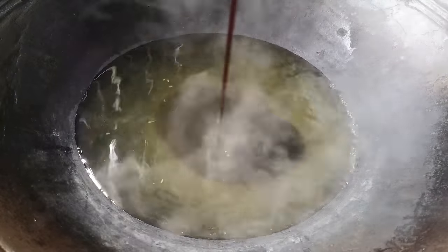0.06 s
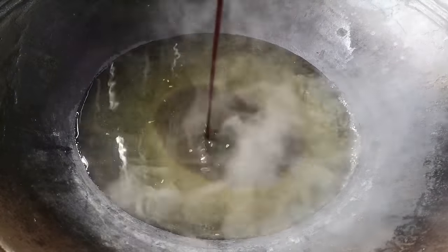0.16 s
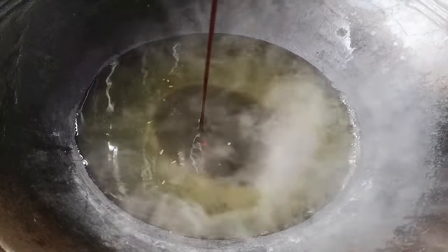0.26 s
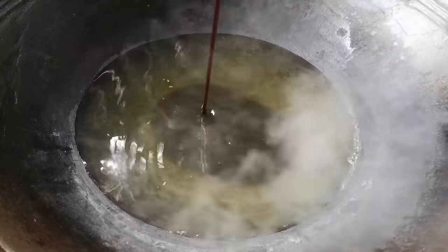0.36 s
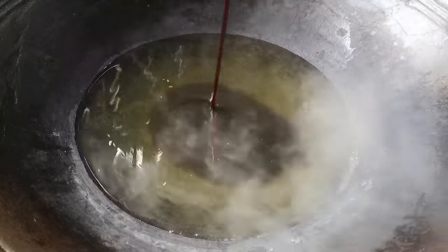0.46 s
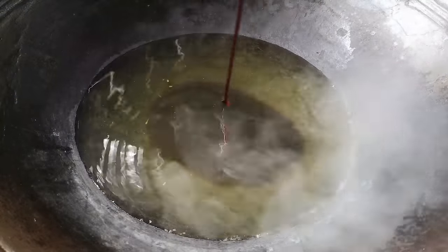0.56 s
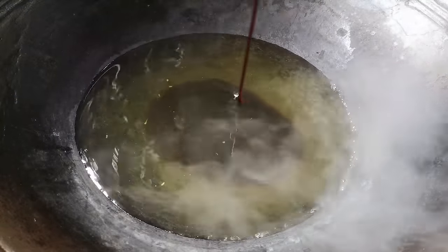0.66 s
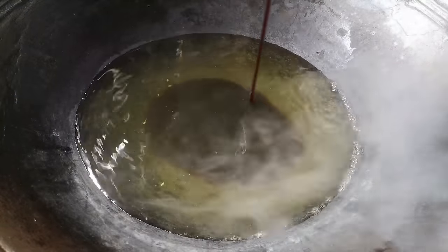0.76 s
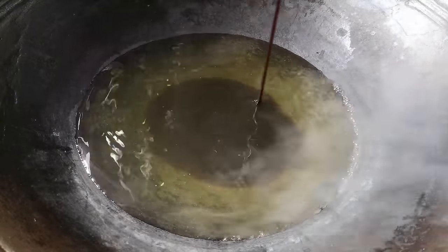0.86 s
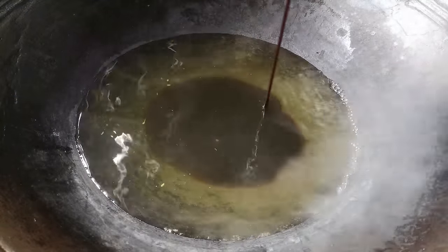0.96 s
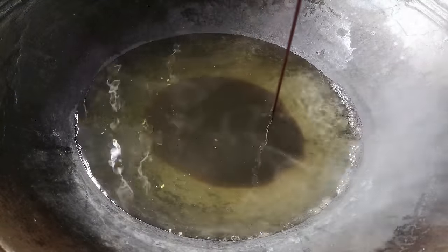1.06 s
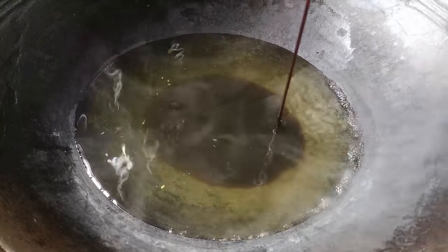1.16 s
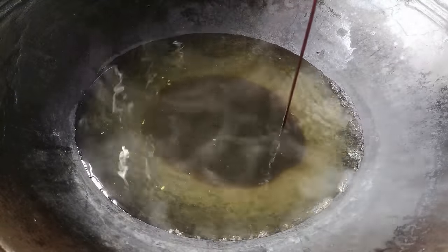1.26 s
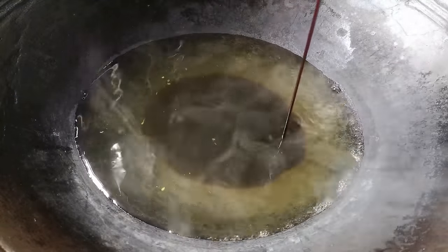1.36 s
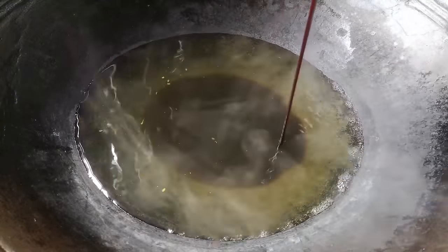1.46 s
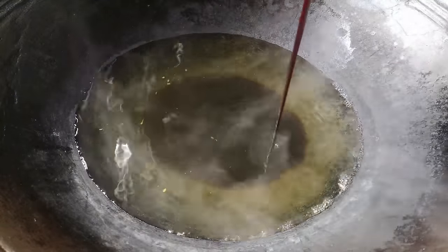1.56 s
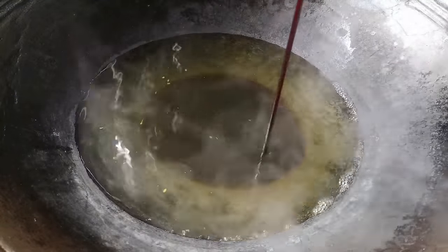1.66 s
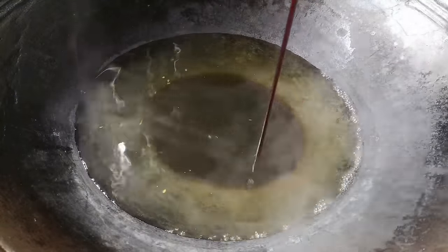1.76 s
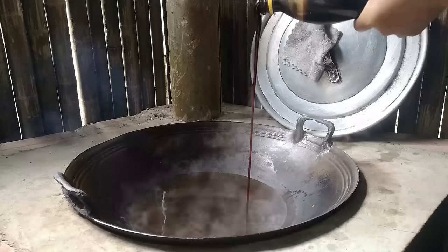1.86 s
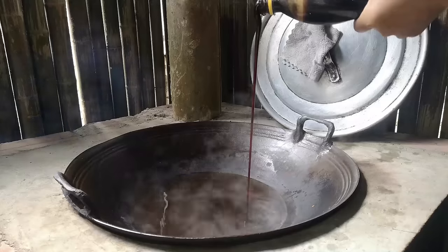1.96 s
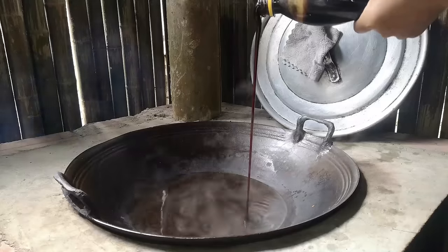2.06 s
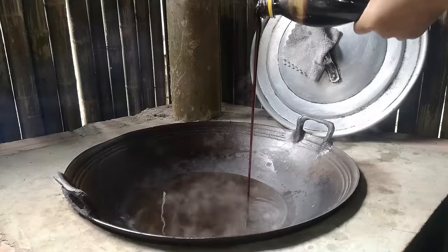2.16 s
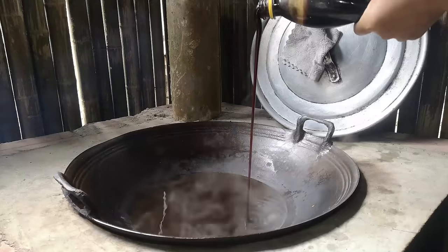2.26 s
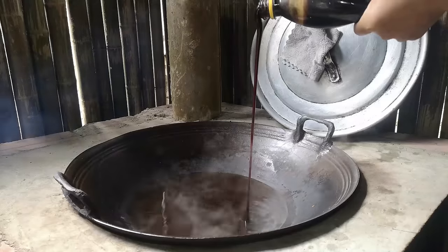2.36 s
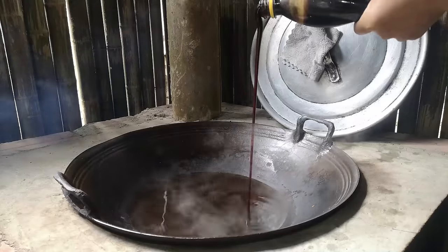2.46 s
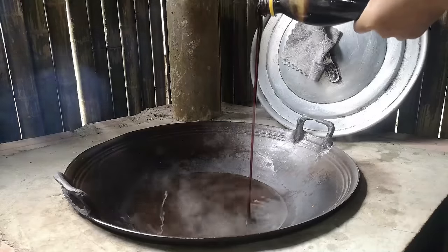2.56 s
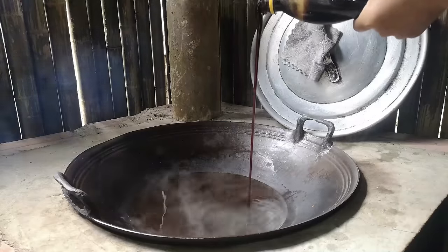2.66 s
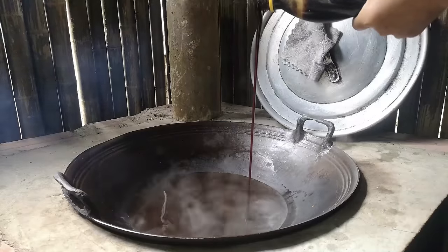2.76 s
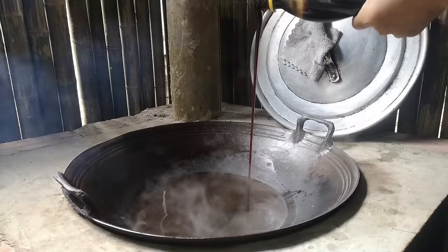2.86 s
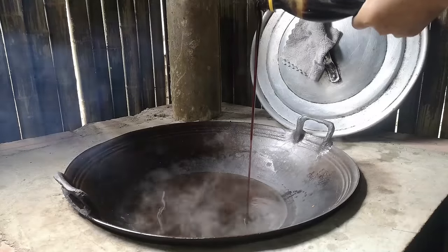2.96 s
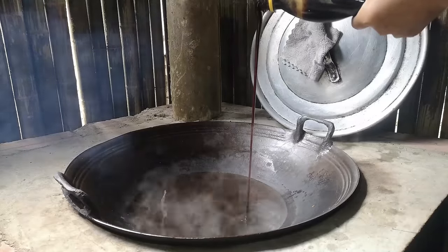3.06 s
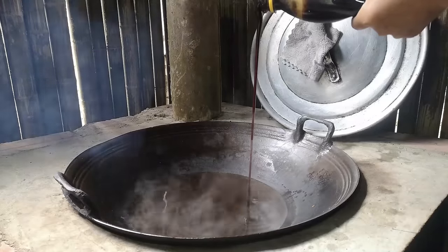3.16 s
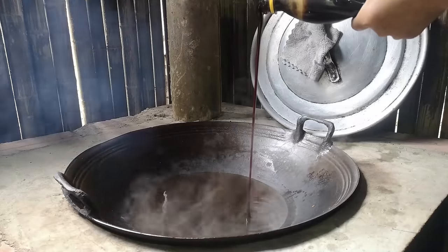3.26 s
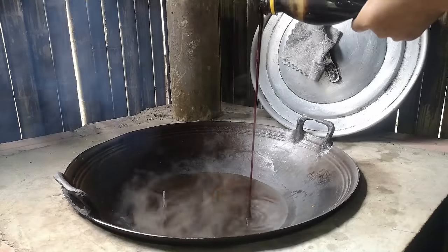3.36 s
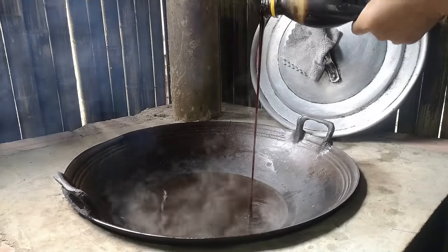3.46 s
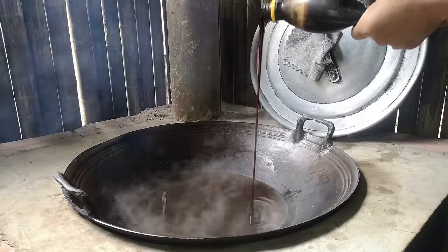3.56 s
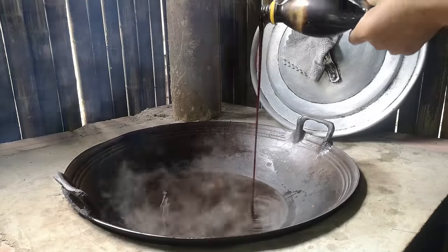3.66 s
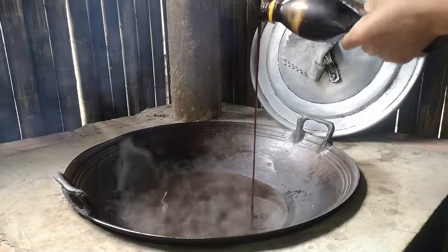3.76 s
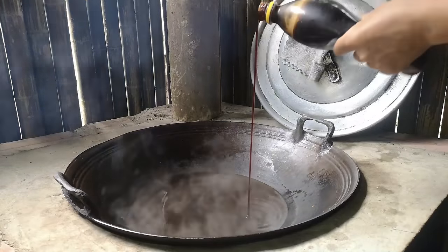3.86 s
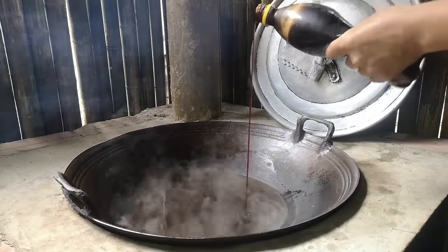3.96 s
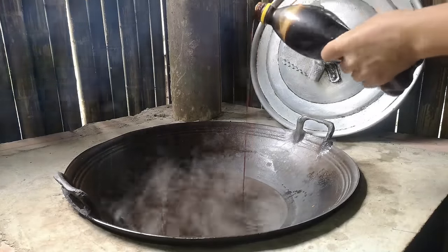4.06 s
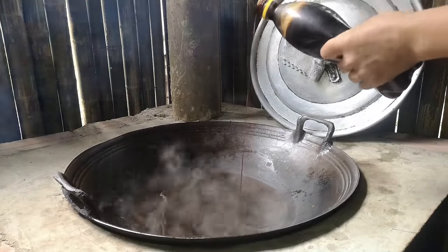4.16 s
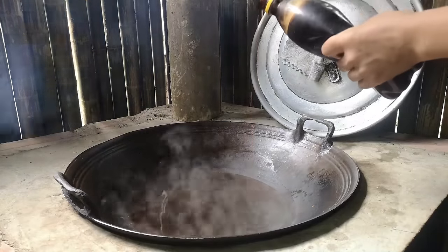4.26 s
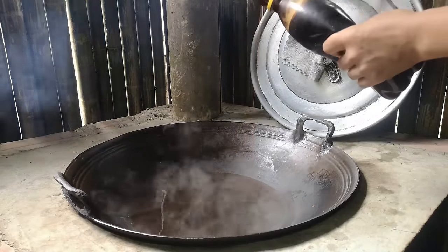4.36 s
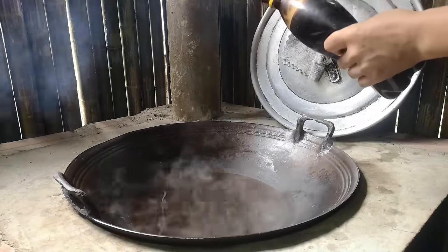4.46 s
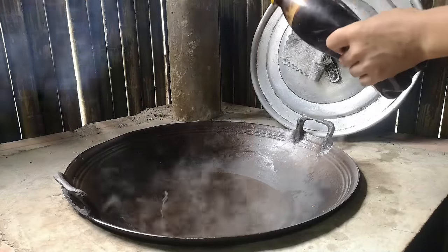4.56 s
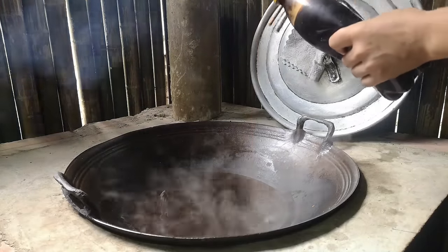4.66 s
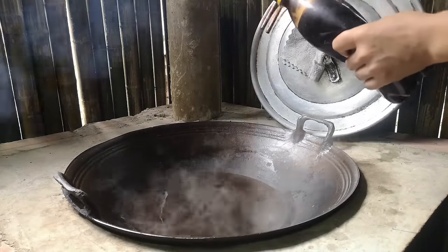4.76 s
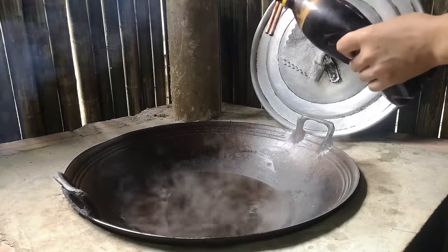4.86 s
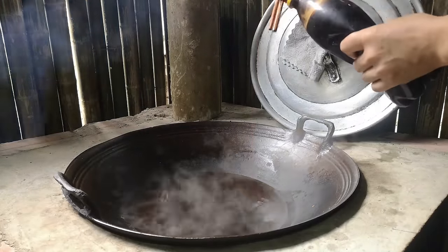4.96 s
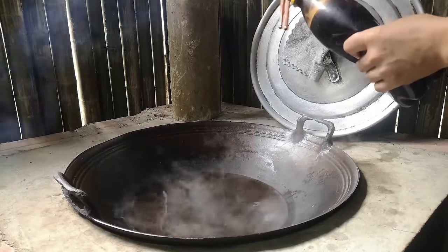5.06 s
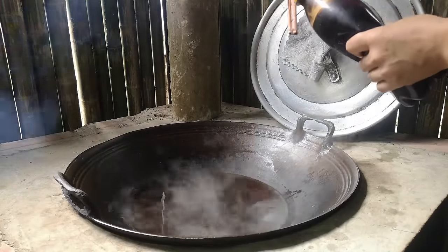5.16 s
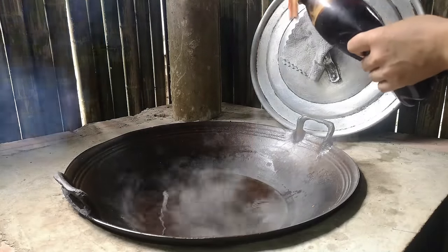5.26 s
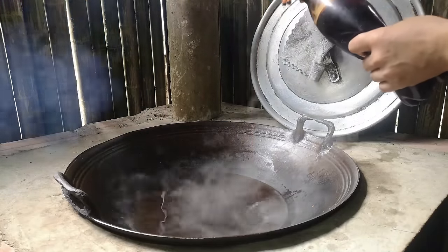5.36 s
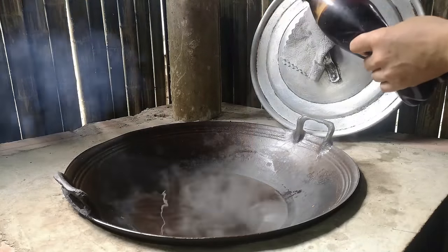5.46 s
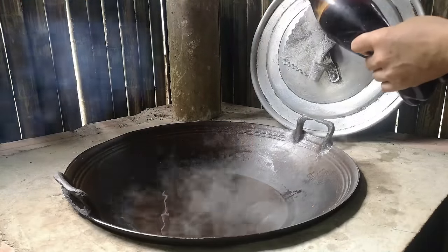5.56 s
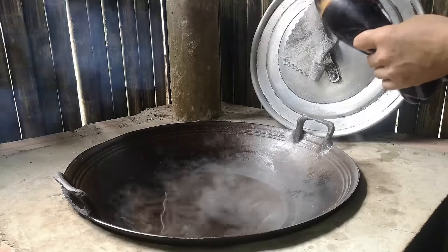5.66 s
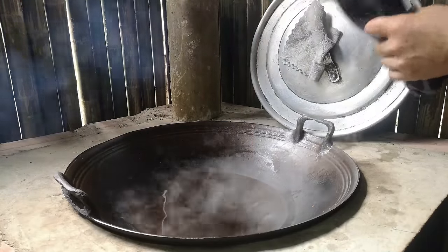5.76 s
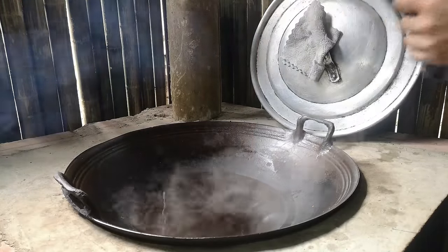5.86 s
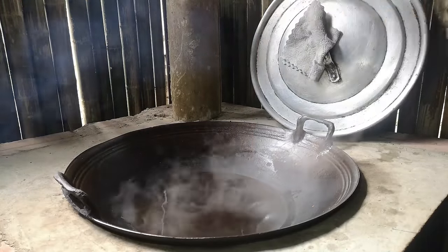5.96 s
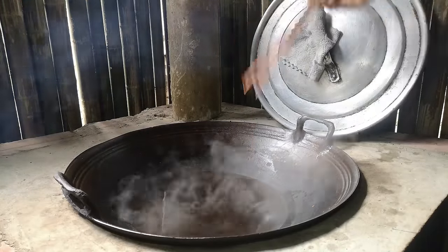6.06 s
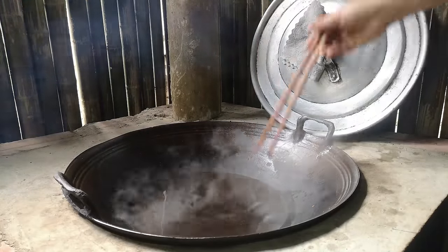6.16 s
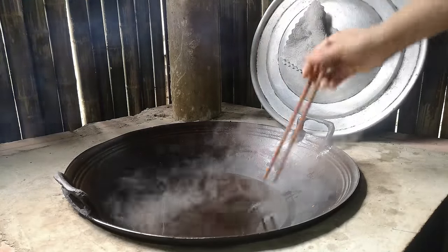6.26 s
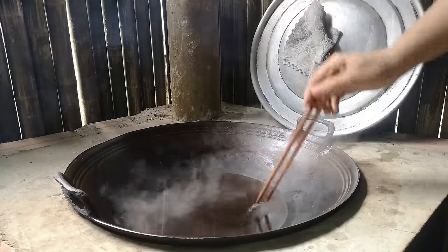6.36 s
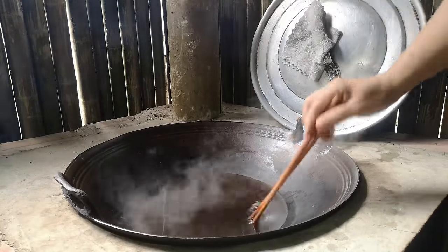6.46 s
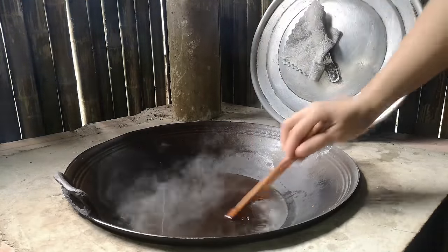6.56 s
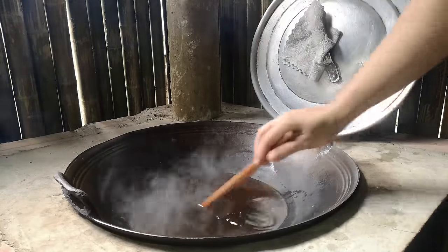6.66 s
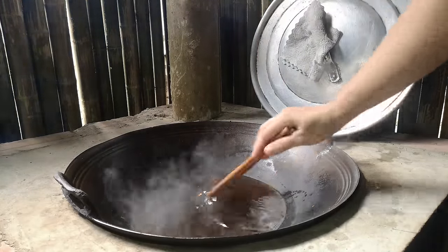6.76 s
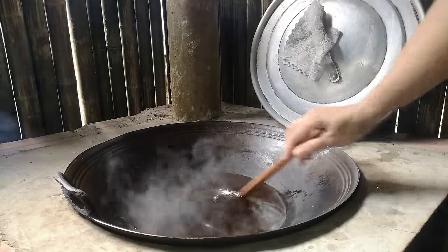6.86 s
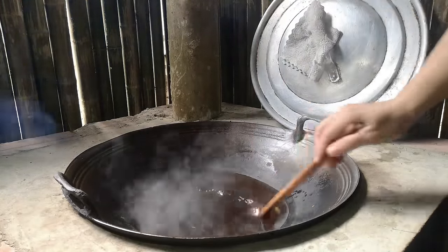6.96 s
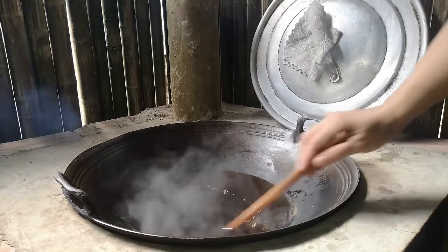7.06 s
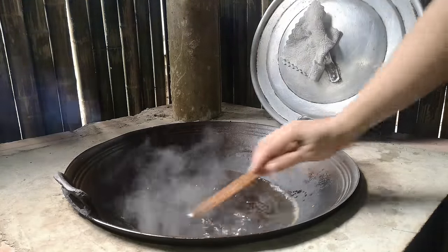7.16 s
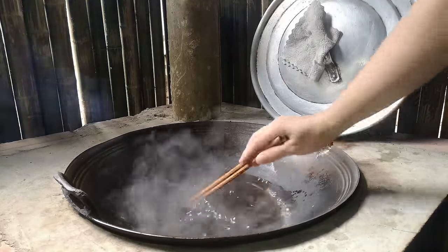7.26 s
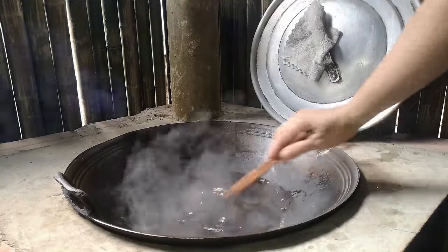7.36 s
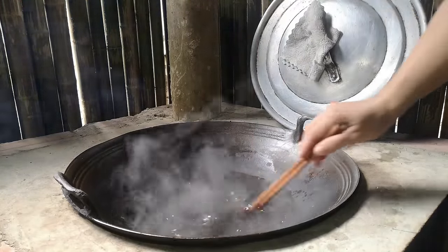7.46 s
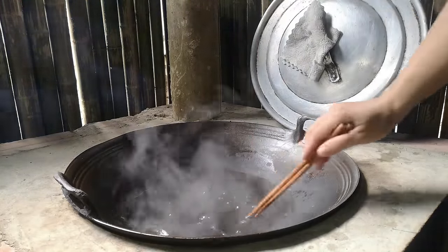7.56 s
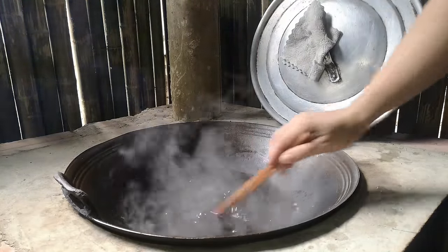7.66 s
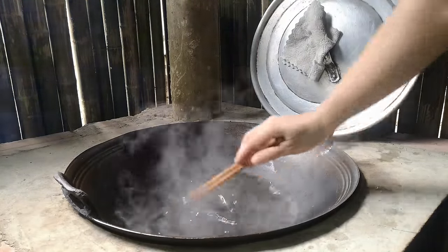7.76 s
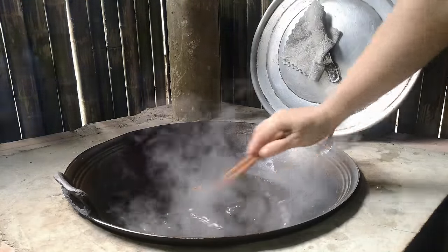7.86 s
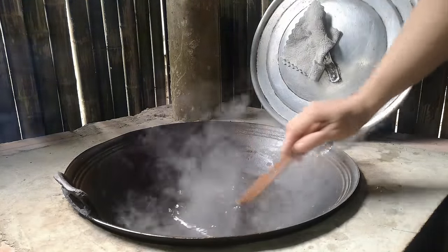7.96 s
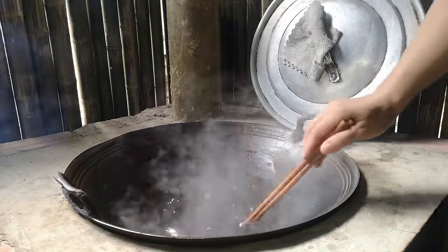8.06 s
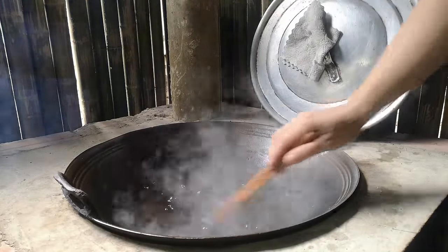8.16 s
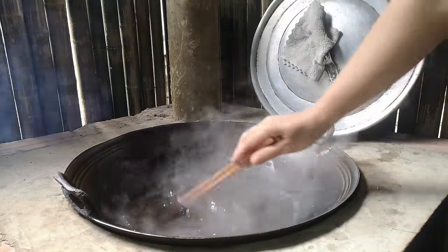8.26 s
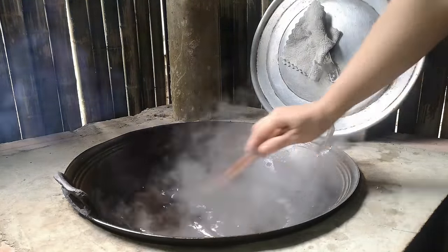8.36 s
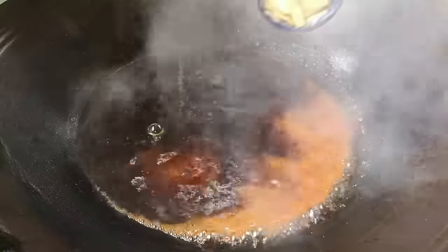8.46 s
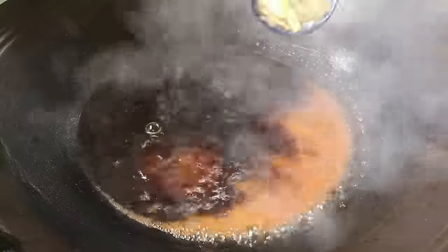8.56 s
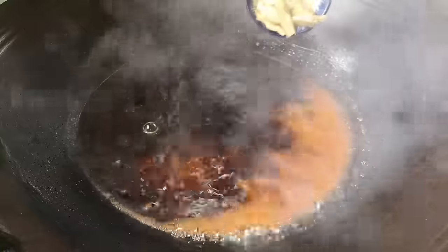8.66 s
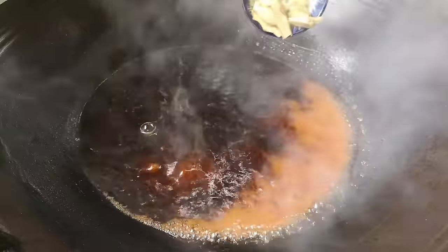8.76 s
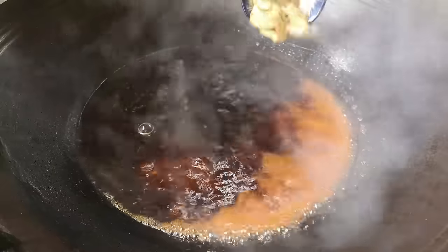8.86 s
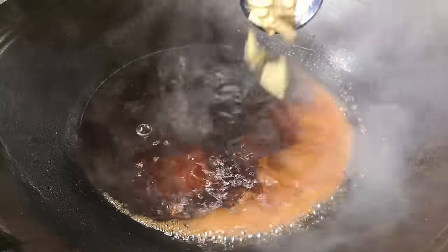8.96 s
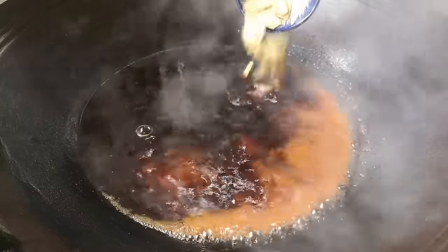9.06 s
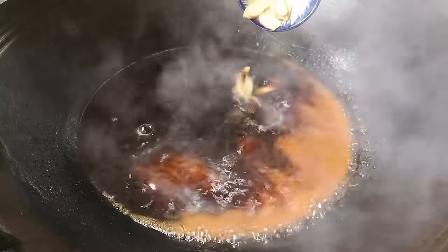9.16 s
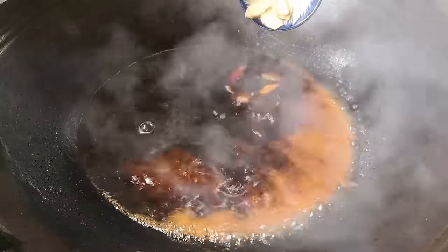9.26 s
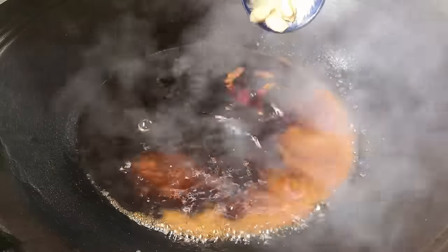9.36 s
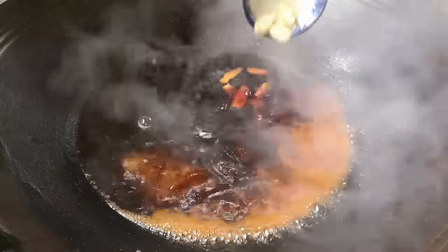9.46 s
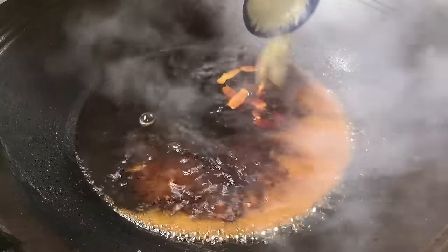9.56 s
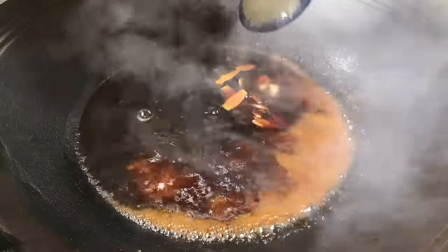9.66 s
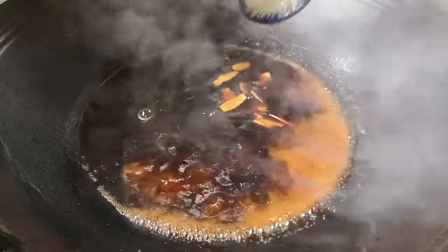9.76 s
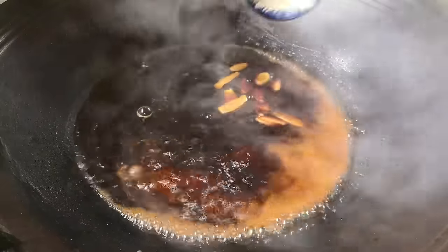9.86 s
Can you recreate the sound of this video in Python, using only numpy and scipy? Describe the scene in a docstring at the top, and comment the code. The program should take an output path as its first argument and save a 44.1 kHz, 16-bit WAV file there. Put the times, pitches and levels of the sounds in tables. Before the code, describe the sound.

Thin syrup sizzles in hot oil, then chopsticks knock, scrape and squeal in a steel wok before loud boiling, plopping slices and a trilling barbet.

```python
"""Syrup poured into hot oil sizzles close by in a steel wok in an open-air kitchen, amid small birds' chirps.
A cut to a farther shot drops the frying and draught; drops spit, a bottle clonks, chopsticks knock and scrape.
After a cut to a close shot boiling is loud, slices plop in, a barbet trills and a wind puff hits the microphone.
Frying, scraping and swishing are shaped random impulses, the wok and wood are damped modes, the birds are
gliding or pulsed tones, and air, spray and plops use coloured noise."""
import sys
import numpy as np
from scipy import signal
from scipy.fft import rfft, irfft, next_fast_len
from scipy.io import wavfile

SR = 44100
rng = np.random.default_rng(int(sys.argv[2]) if len(sys.argv) > 2 else 0)


def write(x):
    x = np.atleast_2d(x).T
    wavfile.write(sys.argv[1], SR, np.round(np.clip(x, -1, 1) * 32767).astype(np.int16))


N = 437472
TIME = np.arange(N) / SR  # s from the start of the scene
AGE = np.arange(SR // 2) / SR  # s from the start of one event
CUT_FAR, CUT_CLOSE = 1.827, 8.425  # s, cut to a farther shot, then cut to a close one
DIP_IN, ON_STEEL, CIRCLING = 6.29, 6.634, 6.95  # s, tips enter the syrup, meet the steel, start to circle
TOP_HZ = 15500  # the microphone's band limit


def amp(db):
    """Decibel law: a level in dB becomes an amplitude gain."""
    return np.exp(np.asarray(db) * (np.log(10) / 20))


def unit(x):
    """Power normalisation: scale to rms 1."""
    return x / np.sqrt(np.mean(x ** 2) + 1e-20)


def along(points, hz):
    """Logarithmic frequency scale: interpolate (Hz, value) points along it."""
    f, v = np.transpose(points)
    return np.interp(np.log(hz + 1), np.log(f + 1), v)


def wobble(rate):
    """Band-limited fluctuation: a smooth random curve with rate knots a second."""
    knots = rng.standard_normal(4096)
    return np.interp(TIME * rate, np.arange(8 * 4096) / 8, signal.resample(knots, 8 * 4096))


def fade(t60):
    """Exponential damping: the level falls 60 dB in t60 seconds."""
    return amp(-60 * AGE / t60)


def after(s):
    """Gating: a 4 ms switch from 0 to 1 centred on s."""
    return np.clip((TIME - s) / .004 + .5, 0, 1)


def bell(s, half, db):
    """Smooth envelope: a symmetrical swell round a time."""
    return amp(db) * np.exp(-.5 * np.abs((TIME - s) / half) ** 1.5)


def stroke(s, hold, attack, release, db):
    """Exponential envelope: rise, hold and fall; attack and release are the times for 20 dB."""
    rising = (s - TIME) / attack
    falling = (TIME - s - hold) / release
    return amp(db - 20 * np.maximum(0, np.maximum(rising, falling)))


def together(levels):
    """Incoherent addition: unrelated sounds add in power."""
    return np.sqrt(sum(level ** 2 for level in levels))


def add(track, s, sound):
    """Superposition: mix a sound into a track at a time."""
    part = track[..., round(s * SR):][..., :sound.shape[-1]]
    part += sound[..., :part.shape[-1]]


def filtered(x, response):
    """Linear filtering: multiply the spectrum of x by a response of frequency."""
    n = x.shape[-1]
    m = next_fast_len(n + 4096)
    return irfft(rfft(x, m) * response(np.fft.rfftfreq(m, 1 / SR)), m)[..., :n]


# Interchannel coherence. Each row: frequency in Hz, left-right likeness from 0 to 1.
COHERENCE = [(100, 1), (300, 0.28), (1100, 0.31), (2500, 0.17), (8000, 0.13), (14000, 0.11)]


def spread(pair, spectrum, left, lead=0):
    """Partial coherence: two noises become coloured stereo, middle rms 1, its left side lead seconds early."""
    n = pair.shape[-1]
    m = next_fast_len(n + 4096)
    hz = np.fft.rfftfreq(m, 1 / SR)
    turn = np.arccos(np.clip(along(COHERENCE, hz), 0, 1)) / 2
    coloured = rfft(pair.astype(np.float32), m) * amp(along(spectrum, hz))
    mid, side = coloured * [np.cos(turn), np.sin(turn)]
    lean = amp(along(left, hz) / 2)
    early = np.exp(2j * np.pi * lead * hz)
    sides = np.array([(mid + side) * lean * early, (mid - side) / lean], np.complex64)
    out = irfft(sides, m)[:, :n]
    return out / np.std(out.mean(0))


def noise(size):
    """Statistical independence: two unrelated white noises."""
    return rng.standard_normal((2, size))


def grains(rate, scatter_db, size=N):
    """Shot noise: random tiny impulses of uneven size, rate a second, rms 1."""
    hit = np.flatnonzero(rng.random(size) < rate / SR)
    out = np.zeros((2, size))
    uneven = amp(scatter_db * np.clip(rng.standard_normal(len(hit)), -2, 2))
    out[:, hit] = uneven * noise(len(hit))
    return unit(out)


def echo(x, t60s):
    """Diffuse reverberation: a stereo noise tail in which each frequency dies at its own speed."""
    hz, t, z = signal.stft(noise(SR // 2), SR, nperseg=256)
    decay = amp(-60 * t / along(t60s, hz)[:, None])
    tail = signal.istft(z * decay, SR, nperseg=256)[1]
    tail = np.float32(tail / np.linalg.norm(tail[0]))
    return signal.fftconvolve(np.float32(np.atleast_2d(x)), tail, axes=1)[:, :N]


# Spectra of the outdoor hush and the draught. Each row: frequency in Hz, relative level in dB per Hz.
HUSH_SPECTRUM = [(59, -43.5), (100, -5), (126, -7), (156, -13.5), (238, -15), (355, -18.5), (386, -21.5),
                 (560, -25), (791, -24.5), (2180, -17), (4560, -25), (7730, -25), (15500, -36)]
RUMBLE_SPECTRUM = [(8.8, -59), (15, 5.5), (56, -7), (102, -11.5), (200, -29), (450, -37), (580, -100),
                   (990, -120)]
# Stereo lean of the hush. Each row: frequency in Hz, left minus right in dB.
HUSH_LEAN = [(100, -2), (700, 4.5), (2400, 3.5), (4500, 2.5), (8000, 12), (12000, -3)]
# Swells of the draught. Each row: centre in seconds, half width in seconds, level in dB before the flutter.
SURGES = [(1.5, .045, -32), (6.5, .1, -45), (9.88, .13, -42)]
# The puff of wind. Its one row: centre in seconds, half length in seconds, peak in dB.
GUST = (9.872, .028, -8)
DRAUGHT_NEAR_DB, DRAUGHT_FAR_DB = -45, -54  # before and after the first cut, under the flutter
LEFT_LEAD_S = .00059  # the left side comes this much early


def open_air():
    """Turbulent pressure: steady hush, a fluttering draught round the stove, and one puff on the microphone."""
    hush = amp(-58.3) * spread(noise(N), HUSH_SPECTRUM, HUSH_LEAN, LEFT_LEAD_S)
    steady = amp(np.where(TIME < CUT_FAR, DRAUGHT_NEAR_DB, DRAUGHT_FAR_DB))
    draught = together([steady] + [bell(*surge) for surge in SURGES])
    rumble = draught * amp(2.6 * wobble(11)) * spread(noise(N), RUMBLE_SPECTRUM, [(100, 0)])
    s, half, db = GUST
    u = (TIME - s) / half
    puff = -amp(db) * (1 - u * np.maximum(u, 0)) * np.exp(-u * u / 2)  # the pressure sinks and swings back
    return hush + rumble + puff


def heating(stage, start, end):
    """Exponential growth: the steadily rising level in dB of one stage of frying."""
    db, db_per_s = stage
    return amp(db + db_per_s * (TIME - start)) * (after(start) - after(end))


def fizz(crackle_db):
    """Bubble-burst statistics: dense small bursts with sparse, more uneven ones on top."""
    return grains(rate=9000, scatter_db=-1.5) + amp(crackle_db) * grains(rate=260, scatter_db=6)


# Spectra of frying oil and boiling syrup. Each row: frequency in Hz, relative level in dB per Hz.
OIL_SPECTRUM = [(400, -43), (650, -14.5), (1200, -5), (2200, -2.5), (3800, -4), (5200, 0), (6500, -4.5),
                (7800, 2.5), (9200, -7), (11500, -12.5), (15000, -16)]
SYRUP_SPECTRUM = [(260, 0), (450, -8.5), (903, -7.5), (1230, -3.5), (1710, -3.5), (2070, -2), (2290, -4),
                  (4400, -7), (7730, -1.5), (11500, -16.5), (14600, -16.5), (15500, -21)]
# Stereo lean of the pan. Each row: frequency in Hz, left minus right in dB.
PAN_LEAN = [(100, 5.5), (350, 4.5), (750, 10.5), (1250, 3), (2400, 9.5), (4500, 7), (8100, 12), (15000, -3)]
# Stages of frying, before the flicker. Each holds: level at its start in dB, growth in dB per second.
OIL_NEAR = (-46, .2)
OIL_FAR = (-67.5, 1.4)
SIMMER = (-60, 4.5)
BOILING = (-43.5, 2.6)
# Chopstick strokes. Each row: start in seconds, hold in seconds, release in seconds per 20 dB,
# then relative levels in dB of swish, scrape, sizzle and boom, and scrape brightness in Hz.
STROKES = [(6.325, .025, .06, -47, -56, -60, -70, 2500), (6.381, .014, .06, -41, -46, -49, -70, 2800),
           (6.438, .07, .05, -41.5, -48, -45, -70, 2500), (6.54, .03, .025, -38, -58, -43, -70, 3500),
           (6.648, .03, .08, -51, -37, -56, -32, 4500), (6.695, .028, .085, -49, -30, -53, -30.5, 3600),
           (7.035, .025, .06, -48, -38, -55, -51, 2700), (7.078, .012, .055, -34.5, -42, -40, -49, 3500),
           (7.26, .085, .14, -47, -33.5, -32.5, -32.5, 3000), (7.745, .06, .06, -58, -35.5, -50, -41, 2100),
           (7.835, .05, .07, -49, -32.5, -37.5, -40.5, 2700), (8.065, .035, .05, -55, -41, -47, -52, 2800),
           (8.277, .1, .075, -42, -31.5, -43.5, -41, 3000)]
# Slices dropped into the syrup. Each row: start in seconds, relative plop level in dB, body frequency in Hz,
# t60 in seconds, hiss level in dB before the flicker.
SLICES = [(9.099, -40, 145, 0.17, -56), (9.24, -37, 148, 0.29, -37), (9.4, -47, 140, 0.12, -46)]
# Syrup washed up the hot wall flares late in the hold: share of the hold, further lag, width over stroke length
WASH_AT, WASH_LAG_S, WASH_SHARE = .8, .003, .55
HISS_LAG_S, HISS_S = .12, .022  # a slice's hiss: delay, half width


def frying():
    """Steam-bubble bursting: fine fizz and coarser crackle, flaring with each stroke and after each slice."""
    oil = spread(fizz(crackle_db=-18.5), OIL_SPECTRUM, PAN_LEAN) * amp(.5 * wobble(5))
    syrup = spread(fizz(crackle_db=-17.5), SYRUP_SPECTRUM, PAN_LEAN, LEFT_LEAD_S)
    calm = heating(OIL_NEAR, 0, CUT_FAR) + heating(OIL_FAR, CUT_FAR, DIP_IN)
    washes = []
    for s, hold, release, _, _, db, _, _ in STROKES:
        half = WASH_SHARE * np.sqrt(hold * release)
        washes.append(bell(s + hold * WASH_AT + WASH_LAG_S, half, db))
    hiss = sum(bell(s + HISS_LAG_S, HISS_S, db) for s, _, _, _, db in SLICES)
    boil = [heating(SIMMER, DIP_IN, CUT_CLOSE), heating(BOILING, CUT_CLOSE, N / SR)]
    wild = together(boil + washes)
    return (oil * (calm + hiss) + syrup * wild) * amp(0.66 * wobble(14))


# Small birds. Each row: start in seconds, length in seconds, start pitch in Hz, end pitch in Hz,
# relative level in dB.
CHIRPS = [(0.245, .04, 6000, 5200, -48), (0.51, .04, 5500, 4500, -47), (0.655, .04, 5900, 5000, -45),
          (1.105, 0.04, 5900, 4900, -44), (1.865, 0.22, 5710, 5850, -59.5), (2.254, 0.053, 6050, 5130, -53),
          (3.57, 0.049, 6140, 5170, -52), (5.213, 0.036, 3540, 2720, -53), (5.575, .03, 3400, 2700, -54),
          (5.86, .03, 3400, 2700, -52)]
# Barbet notes. Each row: start in seconds, relative level in dB.
TRILLS = [(8.432, -32.5), (8.826, -33.5), (9.253, -30), (9.663, -31)]


def birds():
    """Frequency and amplitude modulation: thin gliding chirps and a pulsed barbet, blurred by trees and walls."""
    small, barbet = np.zeros(N), np.zeros(N)
    for s, length, start_hz, end_hz, db in CHIRPS:
        u = np.clip(AGE / length, 0, 1)
        pitch = end_hz + (start_hz - end_hz) * (1 - u)
        depth = 0.18 * np.sqrt(abs(1 - end_hz / start_hz))  # wide glides are also buzzy
        buzz = 1 + depth * np.sin(2 * np.pi * 170 * AGE)
        tone = np.sin(2 * np.pi * np.cumsum(pitch * buzz) / SR)
        add(small, s, amp(db + 3.5) * np.sin(np.pi * u) * tone)
    trill_hz, note_hz = 110, 1175
    for s, db in TRILLS:
        swell = np.interp(AGE, [0, .028, .065, .12], [0.1, 0.95, 0.55, 0])
        beat = np.cos(2 * np.pi * trill_hz * AGE)
        pulses = 1 - 0.85 * beat
        waver = 1.1 * wobble(75.5)[:len(AGE)] + .6 * beat  # each pulse also bends in pitch
        add(barbet, s, amp(db - 4.0) * swell * pulses * np.sin(2 * np.pi * note_hz * AGE + waver))
    chirps = echo(small, [(3000, 0.55), (6000, 0.32)]) * amp([[1.5], [-1.5]])
    trills = barbet + amp(-2) * echo(barbet, [(1000, 0.16)])
    return chirps + trills * amp([[2.8], [-3.5]])


# Soft bumps of handling and of the tips dipping in. Each row: start in seconds, relative level in dB,
# body frequency in Hz, t60 in seconds.
BUMPS = [(1.368, -37, 78, .12), (2.818, -45, 105, .07), (3.923, -33, 310, .05), (3.928, -37, 230, .06),
         (4.157, -37, 100, .1), (6.086, -42, 112, .09), (6.311, -23, 300, .045), (6.56, -35, 95, .1)]


def thumps():
    """Damped resonance: dull bumps and the slices' plops, one main swing with a short puff round it."""
    out = np.zeros((2, N))
    for s, db, hz, t60, *_ in BUMPS + SLICES:
        body = [(hz / 3, -30), (hz, 0), (hz * 1.5, -6), (hz * 4, -27), (hz * 10, -60)]
        lean = amp(np.array([[.5], [-.5]]) * along(PAN_LEAN, hz))
        swing = np.sin(2 * np.pi * hz * AGE) * lean
        puff = 0.35 * spread(noise(len(AGE)), body, PAN_LEAN)
        soft_onset = 1 - fade(0.011)
        add(out, s, amp(db) * fade(t60) * soft_onset * (swing + puff))
    return out


# Spitting drops. Each row: start in seconds, relative level in dB, spray in dB against the pop.
POPS = [(3.4235, -14, -12), (3.659, -30, -17), (5.322, -39, -9.5), (6.0435, -37.5, -14), (6.241, -37, -20),
        (7.405, -16.5, -9), (8.0452, -17, -15), (9.229, -25, -21), (9.246, -18.5, -28), (9.607, -25, -26),
        (9.750, -32, -17)]
# Spectrum of a pop. Each row: frequency in Hz, relative level in dB per Hz.
SPIT_SPECTRUM = [(200, -24), (1000, -13), (3200, -14), (4800, 3), (6000, 4), (8200, 7.5), (10500, -5.5),
                 (15000, -13)]


def spitting():
    """Explosive vaporisation: a trapped drop bursts and throws a short spray onto the hot steel."""
    out = np.zeros((2, N))
    for s, db, spray_db in POPS:
        shape = fade(0.011) + amp(spray_db) * fade(0.21)
        add(out, s, amp(db - 6.5) * shape * spread(noise(len(AGE)), SPIT_SPECTRUM, PAN_LEAN))
    return out


# Clonks of the handled bottle. Each row: start in seconds, relative level in dB.
CLONKS = [(3.9228, -47), (5.4190, -35.5), (5.4235, -43)]
# Modes of the bottle. Each row: frequency in Hz, level in dB before a random change at each clonk.
BOTTLE_MODES = [(665, -5), (927, -7), (1150, -3), (1530, 0), (1680, 0), (1950, 1), (4050, -15)]
BOTTLE_T60 = .034  # s


def clonking():
    """Modal decay: the handled bottle gives a short hollow clonk of a few damped tones."""
    out = np.zeros((2, N))
    for s, db in CLONKS:
        ring = np.zeros(len(AGE))
        for hz, level in BOTTLE_MODES:
            ring += amp(level + 1.5 * rng.standard_normal()) * np.sin(2 * np.pi * hz * AGE)
        soft_onset = 1 - fade(.003)
        add(out, s, amp(db) * ring * fade(BOTTLE_T60) * soft_onset * amp([[2.5], [-3]]))
    return out


def bubbles(centre_hz, cycles, rise, count):
    """Bubble resonance: each bubble rings briefly and glides up as it nears the surface."""
    out, t = np.zeros(N), AGE[:SR // 20]
    times = rng.uniform(DIP_IN, CUT_CLOSE, count)
    for when, (size, strength) in zip(times, rng.standard_normal((count, 2))):
        hz = centre_hz * np.exp(.23 * np.clip(size, -2, 2))
        life = t * hz / cycles
        envelope = np.sqrt(life) * np.exp(-life)
        tone = np.sin(2 * np.pi * hz * t * (1 + rise * life))
        add(out, when, amp(1.6 * min(strength, 2)) * envelope * tone)
    return out / np.std(out[out != 0])


# Spectrum of the swish. Each row: frequency in Hz, relative level in dB per Hz.
SWISH_SPECTRUM = [(700, -24), (1400, -1), (2000, 4), (3600, 1), (5500, -2), (9000, -34)]
PRESS_S = .055  # a stroke builds 20 dB in this time
LIGHT_TOUCH_DB = -48.5  # the circling tips between strokes, before the flicker
GURGLE_DB = -6  # bubbles against the stroke


def swishing():
    """Flow noise and entrained bubbles: the tips swish through the syrup and whip gurgles into it."""
    swish = spread(grains(rate=2500, scatter_db=3), SWISH_SPECTRUM, PAN_LEAN)
    gurgle = bubbles(centre_hz=1700, cycles=12, rise=.008, count=330) * amp([[3], [-4.5]])
    speed = together([stroke(s, hold, PRESS_S, release, db) for s, hold, release, db, *_ in STROKES])
    presses = [stroke(s, hold, PRESS_S, release, db) for s, hold, release, _, db, *_ in STROKES]
    churn = together([speed, amp(LIGHT_TOUCH_DB) * after(CIRCLING)] + presses)
    return (speed * swish + amp(GURGLE_DB) * churn * gurgle) * amp(1.4 * wobble(45)) * after(DIP_IN)


# Modes of the wok. Each row: frequency in Hz, level in dB before lean and chance, t60 in seconds.
WOK_MODES = [(168, -30, .4), (357, -15, .35), (745, -14, .2), (790, -17, .15), (1106, -5, .25),
             (1266, -8, .17), (1360, -4, .15), (1600, -9, .12), (1777, 0, .16), (1895, -3, .13),
             (2100, -6, .1), (2228, 1, .2), (2326, -5, .17), (2630, -4, .17), (2768, -4, .15),
             (2866, -10, .2), (3510, -9, .1)]
# Spectrum of the wok's dense bed. Each row: frequency in Hz, relative level in dB per Hz.
PLATE_SPECTRUM = [(150, -8), (300, -12), (520, -20), (780, -11), (1000, -10), (1300, -3), (1900, 3),
                  (2800, 1), (3400, -7), (5000, -17), (9000, -42.5)]


def wok_ring(plate_db, plate_t60):
    """Modal superposition: one contact excites clear modes over a dense bed of damped ones."""
    hz, db, t60 = np.transpose(WOK_MODES)[:, :, None]
    chance = rng.standard_normal((4, len(WOK_MODES), 1))
    t = AGE[:SR // 4].astype(np.float32)
    offset = np.pi * chance[0] + 0.33 * chance[1:3]  # each side gets a mode at a slightly different phase
    decay = np.exp(np.float32(-np.log(1000) / t60) * t)
    waves = np.sin(np.float32(2 * np.pi * hz) * t + np.float32(offset)) * decay
    lean_db = np.array([.5, -.5])[:, None, None] * along(PAN_LEAN, hz)
    strength = amp(lean_db + db + chance[3])
    bed = amp(plate_db) * fade(plate_t60)[:len(t)] * spread(noise(len(t)), PLATE_SPECTRUM, PAN_LEAN)
    ring = (np.float32(strength) * waves).sum(1) + bed
    return ring / np.std(ring.mean(0)[:512])


# Modes of the chopsticks. Each row: frequency in Hz, relative level in dB, t60 in seconds.
WOOD_MODES = [(3520, 3, .03), (5340, -4, .014), (7120, -3, .012)]


def wood_ring():
    """Bar resonance: the chopsticks' own short clack."""
    clack = sum(amp(db) * fade(t60) * np.sin(2 * np.pi * hz * AGE) for hz, db, t60 in WOOD_MODES)
    return clack[:SR // 4] * amp([[3], [-4.5]])


# Chopstick knocks. Each row: start in seconds, relative level in dB, contact brightness in Hz.
KNOCKS = [(6.6339, -22.5, 9300), (6.639, -27, 7040), (6.7925, -22, 2100), (6.800, -29, 2000),
          (6.953, -41, 9000), (7.0027, -27.5, 1600), (7.029, -32, 3000), (7.081, -30, 3040),
          (8.351, -24.5, 1190)]


def knocking():
    """Impact excitation: wooden tips clack on steel, a softer contact duller and a harder one thinner."""
    out = np.zeros((2, N))
    for s, db, bright_hz in KNOCKS:
        top_hz = min(bright_hz, SR / 3)
        contact = signal.butter(2, [top_hz / 7, top_hz], "band", fs=SR)
        ring = wok_ring(plate_db=15.5, plate_t60=0.063) + amp(-3) * wood_ring()
        add(out, s, amp(db - 3.5) * signal.lfilter(*contact, ring))
    return out


def slipping(ring, top_hz, size):
    """Stick-slip excitation: irregular tiny slips ring a body, dulled above top_hz; the middle has rms 1."""
    slips = grains(rate=1100, scatter_db=2.5, size=size)[:1]
    rub = signal.fftconvolve(slips, ring, axes=1)[:, :size]
    rub = filtered(rub, lambda hz: 1 / np.sqrt(1 + (hz / top_hz) ** 8))
    return rub / np.std(rub.mean(0))


def fresh_spot():
    """Position-dependent modal response: the wok's answer at a new place."""
    return wok_ring(plate_db=9, plate_t60=0.08)


# Wood ringing as it first drags on the steel. Its one row: hold in seconds, release in seconds per 20 dB,
# level in dB before the flicker.
CHATTER = (.08, .07, -46)
LIGHT_TOP_HZ = 2600  # a light touch rubs dully


def scraping():
    """Stick-slip friction: each stroke rubs a new spot at its own brightness; the first hard drag chatters."""
    out = amp(LIGHT_TOUCH_DB) * after(CIRCLING) * slipping(fresh_spot(), LIGHT_TOP_HZ, size=N)
    for s, hold, release, _, db, _, _, top_hz in STROKES:
        start = s - .1  # leaves room for the rising pressure
        pressure = stroke(s, hold, PRESS_S, release, db)[round(start * SR):][:len(AGE)]
        add(out, start, pressure * slipping(fresh_spot(), top_hz, size=len(AGE)))
    hold, release, db = CHATTER
    drag = stroke(ON_STEEL, hold, PRESS_S, release, db) * after(ON_STEEL)
    out += drag * slipping(wood_ring(), TOP_HZ, size=N)
    return out * amp(1.2 * wobble(110))


def mode(hz, wander, rate):
    """Phase modulation: a tone of rms 1 whose phase wanders randomly."""
    return np.sqrt(2) * np.sin(2 * np.pi * hz * TIME + wander * wobble(rate))


# Squeals of the gripping tips. Each row: centre in seconds, half length in seconds, frequency in Hz,
# relative level in dB.
SQUEALS = [(6.715, .03, 2236, -36), (7.02, .06, 1108, -43), (7.761, .045, 1118, -33), (7.85, .03, 760, -45),
           (7.875, .035, 1110, -35), (7.888, .025, 2215, -35), (8.075, .04, 2310, -41),
           (8.3, .055, 1104, -26.5), (8.36, .02, 775, -39), (8.362, .016, 1110, -32),
           (8.39, .035, 2228, -35)]
BOOM_AT = .3  # the boom lags its stroke by this share of the hold
BOOM_RISE_S, BOOM_RING_S = .04, .17  # the flexing bowl: s per 20 dB
LIGHT_BOOM_DB = -57  # under the circling tips, before the flicker


def singing():
    """Friction-driven resonance: pressing booms the bowl; gripping tips squeal roughly over a low groan."""
    presses = []
    for s, hold, _, _, _, _, db, _ in STROKES:
        presses.append(stroke(s + hold * BOOM_AT, hold, BOOM_RISE_S, BOOM_RING_S, db))
    flex = together([amp(LIGHT_BOOM_DB) * after(CIRCLING)] + presses)
    boom = flex * amp(1.6 * wobble(30)) * mode(hz=165, wander=0.7, rate=22) * after(ON_STEEL)
    grip, squeal = np.zeros(N), np.zeros(N)
    waver = .45 * wobble(55) + .25 * wobble(300)
    for s, half, hz, db in SQUEALS:
        swell = amp(db) * np.clip(1 - (AGE / half - 1) ** 2, 0, 1)
        phase = 2 * np.pi * hz * AGE + waver[round(s * SR):][:len(AGE)]
        add(grip, s - half, swell)
        add(squeal, s - half, swell * np.sqrt(2) * np.sin(phase))
    groan = grip * amp(-20) * mode(hz=357, wander=1.2, rate=35)
    rough_squeal = squeal * amp(2.2 * wobble(150) - 1.5)
    return (boom + groan) * amp([[.7], [-.7]]) + rough_squeal * amp([[2.1], [-2.6]])


# Reverberation under the shed roof. Each row: frequency in Hz, t60 in seconds.
SHED_T60 = [(200, 0.31), (2000, 0.21), (10000, 0.06)]


def scene():
    """Superposition of sources: the hits also echo under the shed roof; stirring stops at the second cut."""
    hits = knocking() + spitting() + thumps() + clonking()
    hits = hits + amp(-15) * echo(hits, SHED_T60)
    stirring = (scraping() + swishing() + singing()) * (1 - after(CUT_CLOSE))
    return frying() + hits + stirring + birds() + open_air()


def record(dry):
    """Band limitation: a steep low-pass removes what lies above the microphone's limit."""
    return filtered(dry, lambda hz: 1 / (1 + (hz / TOP_HZ) ** 120))


dry = scene()
out = record(dry)
write(out)
```